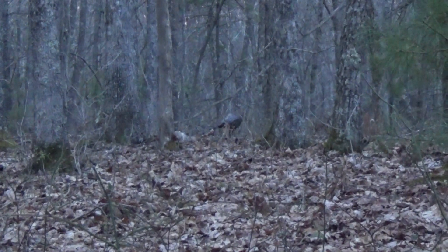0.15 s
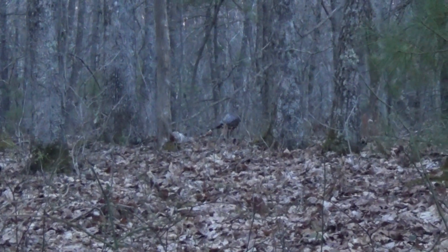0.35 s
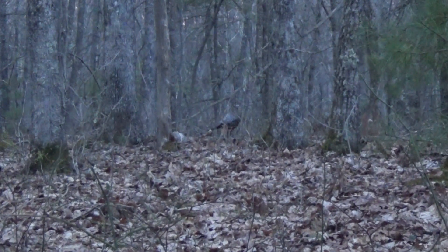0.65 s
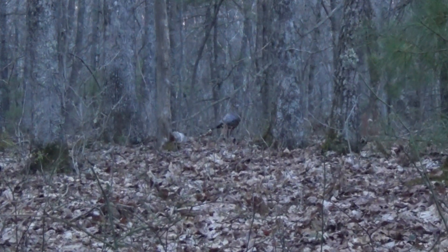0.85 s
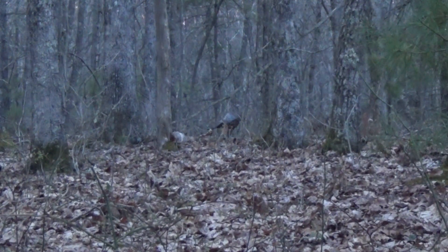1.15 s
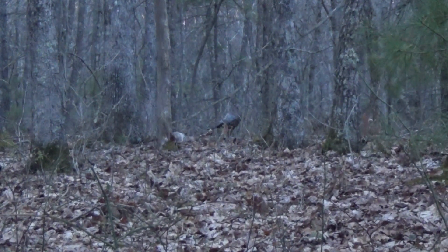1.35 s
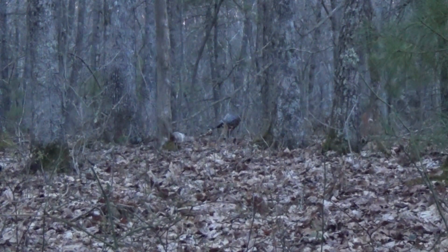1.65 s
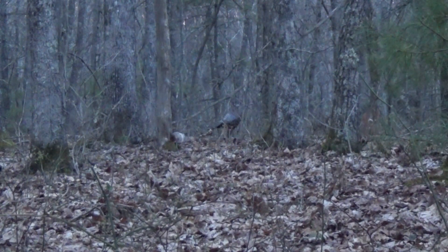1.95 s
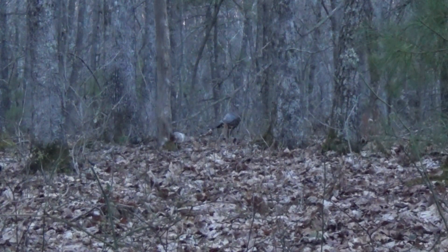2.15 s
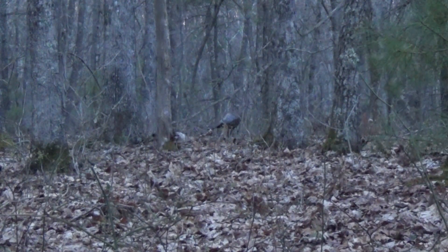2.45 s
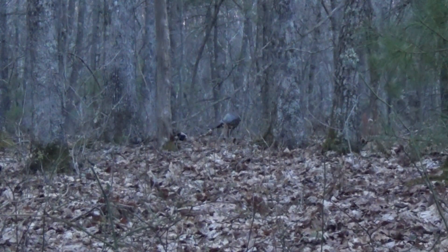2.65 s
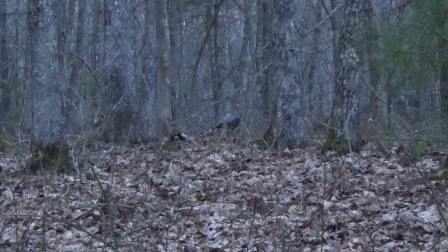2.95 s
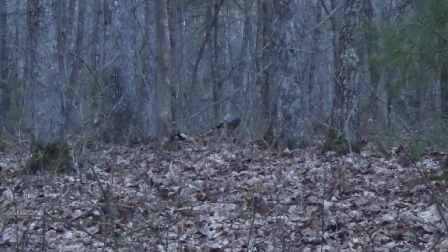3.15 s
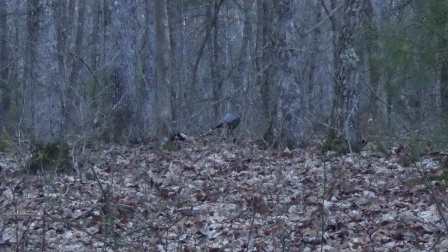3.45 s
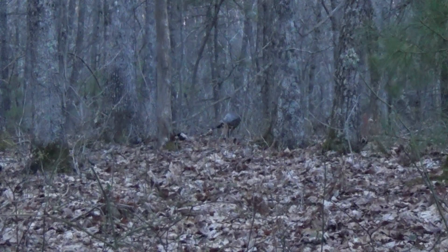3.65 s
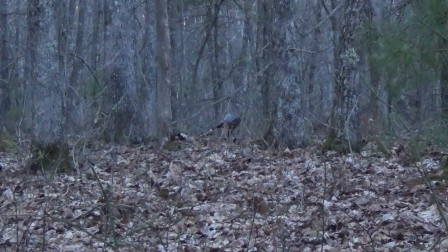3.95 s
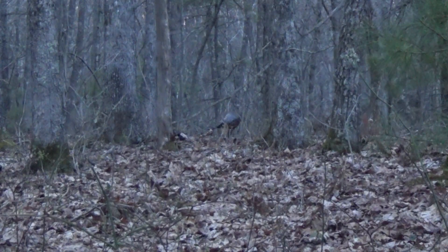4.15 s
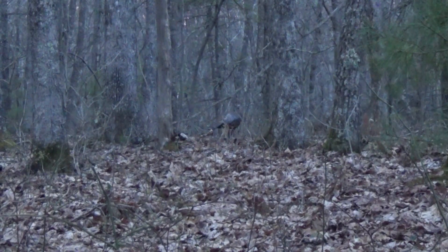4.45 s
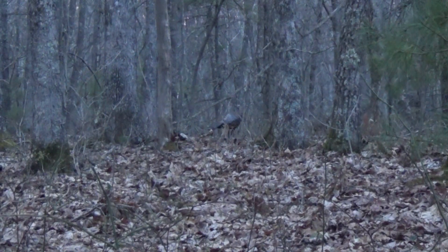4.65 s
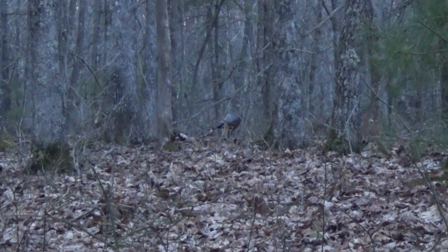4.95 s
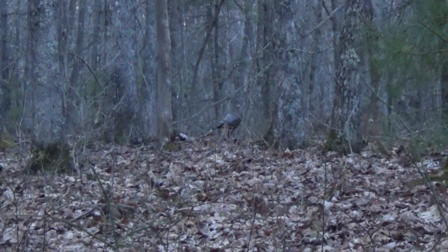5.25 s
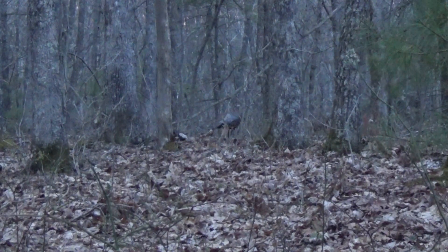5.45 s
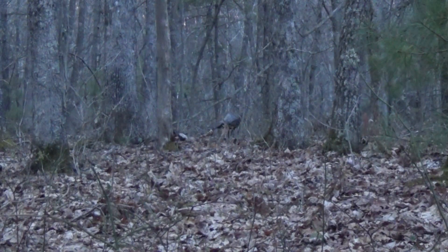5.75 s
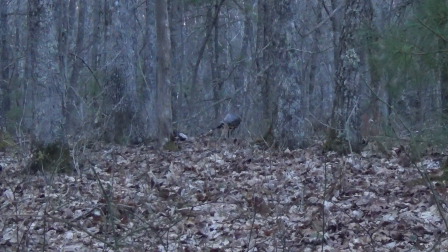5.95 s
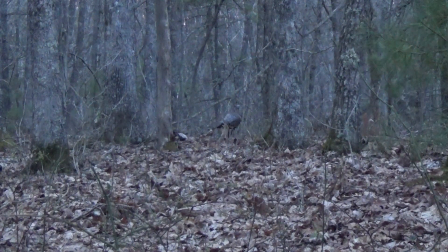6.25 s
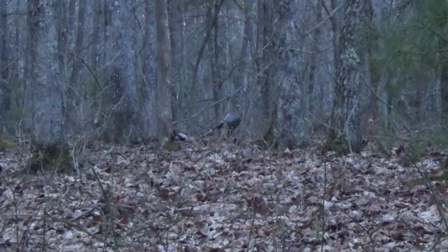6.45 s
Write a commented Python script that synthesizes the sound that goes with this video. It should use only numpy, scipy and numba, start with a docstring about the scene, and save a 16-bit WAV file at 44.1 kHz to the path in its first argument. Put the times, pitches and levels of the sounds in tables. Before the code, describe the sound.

Birds forage in dry leaves on a forest floor, close to a stereo microphone. Their feet rake and scuff in a busy opening flurry, with small stalks snapping and twigs clicking. The rustle thins to scattered ticks, then picks up again with more scratching, snaps and brief rasps of dragged stems. Other birds whistle faintly far away, twice, over the soft steady hush of the woods.

```python
"""Birds foraging in dry leaf litter, close to a stereo pair of microphones on a quiet forest floor.
Their feet rake and scuff the leaves, which buckle in clouds of tiny ticks and keep ticking as they
settle. Stalks snap, knocked twigs ring and dragged stems rasp, with a slight echo from the trunks.
Far off, other birds whistle faintly over the steady hush of the woods."""
import sys
import numpy as np
from scipy import signal
from scipy.fft import rfft, irfft, next_fast_len
from scipy.io import wavfile
from scipy.ndimage import uniform_filter1d
from numba import njit

SR = 44100
rng = np.random.default_rng(int(sys.argv[2]) if len(sys.argv) > 2 else 0)


def generate_wav(signal):
    """Clip the signal to [-1, 1] and save it as 16-bit WAV at the path in sys.argv[1]."""
    frames = np.transpose(np.atleast_2d(signal))
    scaled = np.clip(frames, -1, 1) * 32767
    pcm = np.round(scaled).astype(np.int16)
    wavfile.write(sys.argv[1], SR, pcm)


N = 291501
TIME = np.arange(N) / SR


def undb(db):
    """Decibels to gain."""
    return 10 ** (np.asarray(db) / 20)


def unit(x):
    """Scale to rms 1."""
    return x / np.sqrt(np.mean(x ** 2) + 1e-20)


def curves(table):
    """Each column after the first as a line through time."""
    times, *columns = np.transpose(table)
    return [np.interp(TIME, times, column) for column in columns]


def place(pan_db):
    """Left and right gains at constant power; pan_db is left minus right."""
    gains = undb(np.array([[.5], [-.5]]) * pan_db)
    return gains / np.sqrt(np.mean(gains ** 2, axis=0))


def colour(x, points):
    """Filter x along a curve of (freq_hz, gain_db) points."""
    hz, db = np.transpose(points)
    size = next_fast_len(N, real=True)
    bins_hz = np.maximum(np.fft.rfftfreq(size, 1 / SR), 1)
    gain = undb(np.interp(np.log(bins_hz), np.log(hz), db))
    return irfft(rfft(x, size) * gain, size)[..., :N]


def band(x, low_hz, high_hz, order=2):
    """Causal band-pass."""
    high = min(high_hz, .45 * SR)
    low = min(low_hz, .92 * high)
    return signal.sosfilt(signal.butter(order, [low, high], "band", fs=SR, output="sos"), x)


def spread(pair, side_db):
    """Middle and side to left and right."""
    return pair[0] + undb(side_db) * pair[1] * np.array([[1], [-1]])


def walk(rate_hz):
    """A smooth random wander of rms 1."""
    step = int(SR / rate_hz)
    held = np.repeat(rng.standard_normal(N // step + 1), step)
    return unit(uniform_filter1d(held, step)[:N])


def add(out, start_s, x):
    """Mix x into out from start_s on."""
    i = max(int(start_s * SR), 0)
    out[:, i:i + x.shape[1]] += x[:, :max(N - i, 0)]


# The hush all around the microphones: freq_hz, gain_db
HUSH_COLOUR = [(25, -24), (50, -22), (70, -3), (180, -4.5), (300, -6.5), (480, 2), (850, 3.5), (1800, -0.5),
               (3000, 0.5), (5000, 0), (9000, -2.5), (12200, -8), (16000, -18)]
# A soft hiss in the distance that swells late: time_s, level_db
FAR_HISS = [(0, -83), (4.0, -59), (4.9, -58), (5.3, -52), (5.7, -53), (6.05, -52), (6.35, -52.5),
            (6.61, -53)]


def woods(hush_db=-49, hum_hz=70, hum_db=-87.5):
    """Steady hush, its lows nearly alike left and right, with a faint hum and a hiss far away."""
    middle, side = rng.standard_normal((2, N))
    side = colour(side, [(60, -26), (250, -12.5), (1000, -7.5), (4000, -2.5), (8000, -4), (13000, -41)])
    hush = unit(colour(spread([middle, side], 0), HUSH_COLOUR)) * undb(hush_db + 0.094 * walk(3.5))
    hum = unit(np.sin(2 * np.pi * hum_hz * TIME)) * undb(hum_db + 2 * walk(7.5))
    hiss = unit(band(spread(rng.standard_normal((2, N)), -10.5), 3630, 4980))
    return hush + hum + hiss * undb(curves(FAR_HISS)[0] + walk(11))


def trunk_echo(x, t60_s):
    """The surrounding trunks scatter sound back as a diffuse tail."""
    t = np.arange(SR) / SR
    echo = band(rng.standard_normal((2, SR)), 200, 6000, order=1) * undb(-60 * t / t60_s)
    return signal.oaconvolve(x, echo / np.sqrt(np.sum(echo ** 2) / 2), axes=1)[:, :N]


# Bird notes from far off in the trees: start_s, length_s, start_hz, end_hz, level_db
WHISTLES = [(1.925, 0.028, 3330, 3440, -44), (1.948, 0.04, 3500, 3500, -49),
            (1.975, 0.032, 3500, 3500, -42), (2.02, 0.075, 3480, 3470, -51), (2.045, .03, 4090, 4120, -48),
            (2.108, 0.028, 4120, 4060, -44), (2.16, 0.28, 1150, 1200, -55.5), (2.42, 0.2, 1196, 1155, -58),
            (5.23, .11, 2824, 3060, -48), (5.26, 0.11, 3190, 3520, -50)]


def far_birds(waver_hz=45, trim_db=-4):
    """Thin, quivering whistles, smeared on their way through the trees."""
    out, quiver = np.zeros((2, N)), walk(170)
    for start_s, length_s, start_hz, end_hz, level_db in WHISTLES:
        progress = np.linspace(0, 1, int(length_s * SR))
        glide_hz = start_hz + (end_hz - start_hz) * progress
        pitch_hz = glide_hz + waver_hz * quiver[int(start_s * SR):][:len(progress)]
        note = np.sin(np.pi * progress) * np.sin(2 * np.pi * np.cumsum(pitch_hz) / SR)
        add(out, start_s, note * undb(level_db) * place(0))
    return undb(trim_db) * (out + trunk_echo(out, t60_s=0.84))


# Twigs knocked nearby, dead centre: start_s, pitch_hz, t60_s, level_db
TWIG_KNOCKS = [(.132, 990, 0.017, -25), (.189, 1670, 0.035, -29), (.221, 1190, .018, -29),
               (.304, 1100, .025, -28), (0.309, 376, 0.033, -37), (.511, 3050, 0.011, -28),
               (0.513, 5450, .04, -28.5), (0.544, 3780, 0.024, -28), (.7325, 2160, 0.02, -27),
               (0.7598, 3220, 0.015, -21), (0.773, 1290, 0.0083, -15), (0.9725, 8600, .009, -25),
               (1.0331, 1580, 0.012, -18.5), (1.034, 1190, 0.025, -27), (1.042, 4080, 0.021, -33),
               (1.058, 4050, 0.018, -26), (1.2425, 1450, 0.014, -23), (1.2426, 3750, 0.012, -23),
               (1.2427, 910, 0.016, -25.5), (1.917, 5630, .04, -42), (2.139, 380, 0.021, -34.5),
               (2.327, 1350, 0.015, -33), (2.454, 2330, .018, -35), (2.8398, 8400, 0.011, -25),
               (2.9289, 1990, 0.011, -28), (2.93, 4190, 0.0083, -21), (3.077, 800, 0.031, -29.5),
               (3.105, 1200, .016, -39), (3.159, 1390, 0.01, -31), (3.211, 2430, 0.014, -32),
               (3.255, 1900, .016, -35), (4.062, 1060, 0.01, -23), (4.172, 700, 0.13, -38.5),
               (4.2, 738, 0.094, -37.5), (4.196, 3910, 0.036, -28), (4.356, 736, 0.16, -40),
               (4.445, 3570, 0.023, -21), (4.599, 5500, 0.03, -26), (4.6203, 1040, 0.024, -23),
               (4.621, 720, 0.026, -28), (4.624, 1430, 0.013, -23.5), (4.623, 3350, 0.013, -26),
               (5.856, 400, 0.02, -31.5), (6.019, 1135, 0.047, -34.5)]


def twigs(grit=0.29):
    """A knocked twig rings in one short mode, a little rough where it rubs on the leaves."""
    out, t = np.zeros((2, N)), np.arange(SR // 10) / SR
    for start_s, pitch_hz, t60_s, level_db in TWIG_KNOCKS:
        rub = unit(band(rng.standard_normal((2, len(t))), 1.06 * pitch_hz, 1.26 * pitch_hz))
        ring = np.sin(2 * np.pi * pitch_hz * t) + grit * rub
        envelope = (1 - np.exp(-t * pitch_hz)) * undb(-60 * t / t60_s)
        add(out, start_s, ring * envelope * undb(level_db))
    return out


# Stems dragged over dry leaves close by: start_s, length_s, start_hz, end_hz, level_db
STEM_DRAGS = [(3.072, 0.26, 5340, 5430, -51), (3.12, 0.072, 4030, 3700, -48),
              (3.277, 0.03, 3260, 3400, -44), (4.334, 0.044, 3750, 3910, -40),
              (4.347, 0.036, 1306, 1146, -41.5), (4.534, 0.023, 2895, 2760, -39),
              (4.623, 0.037, 3085, 3290, -39.5), (4.728, 0.19, 1290, 1145, -51.5)]


def stems(slips_per_s=700, relative_width=0.15, side_db=-9):
    """A dragged stem sticks and slips; each slip rings a resonance that moves with the contact point."""
    out = np.zeros((2, N))
    for start_s, length_s, start_hz, end_hz, level_db in STEM_DRAGS:
        progress = np.linspace(0, 1, int(length_s * SR))
        chance, phase = rng.random((2, 2, SR // 2))[..., :len(progress)]
        slips = (chance < slips_per_s / SR) * np.exp(2j * np.pi * phase)
        ring = signal.lfilter([1], [1, -np.exp(-np.pi * relative_width * start_hz / SR)], slips)
        pitch_hz = start_hz + (end_hz - start_hz) * progress
        rasp = np.imag(ring * np.exp(2j * np.pi * np.cumsum(pitch_hz) / SR))
        rasp = unit(spread(band(rasp, start_hz / 2, start_hz * 2), side_db))
        swell = np.sqrt(np.abs(np.sin(np.pi * progress)))
        add(out, start_s, rasp * swell * undb(level_db))
    return out


# Quick scuffs of a foot near the microphones: start_s, length_s, level_db, low_hz, high_hz, pan_db
FOOT_SCUFFS = [(0.071, 0.019, -26.5, 1800, 8450, 4), (.076, 0.02, -35, 300, 2200, 6),
               (0.433, 0.033, -37, 2190, 8690, 11), (0.515, 0.018, -39, 1910, 5510, -8),
               (0.735, 0.0083, -37, 1800, 4500, -7), (3.016, 0.008, -44, 1450, 9540, 4),
               (3.047, 0.016, -39.5, 6510, 9530, 3.2), (4.167, 0.0099, -38, 900, 3400, -6),
               (4.193, 0.016, -38.5, 2560, 4080, -7), (4.352, 0.019, -33, 1740, 4900, -8),
               (4.366, 0.013, -37, 8000, 12000, 0), (4.446, 0.012, -41, 3440, 8500, -3),
               (4.514, 0.022, -39, 3110, 8340, 5), (4.537, 0.021, -36, 5560, 9000, 5),
               (4.616, 0.0083, -31, 2500, 4200, -8), (4.641, 0.015, -47, 2700, 9100, -0.8),
               (5.353, 0.013, -46, 2890, 10120, -2)]


def scuffs(attack_s=0.0019, tail_s=0.0066, rough_db=6, side_db=-7):
    """A foot tears through many leaves at once: a short, ragged burst."""
    out, t = np.zeros((2, N)), np.arange(SR // 10) / SR
    for start_s, length_s, level_db, low_hz, high_hz, pan_db in FOOT_SCUFFS:
        noise = spread(rng.standard_normal((2, len(t))), side_db)
        ragged = noise * undb(rough_db * (2 * rng.random(len(t)) - 1))
        burst = band(band(ragged, low_hz, high_hz, order=1), 250, 9100)
        press = np.minimum(t / attack_s, 1) * np.exp(-np.maximum(t - 0.78 * length_s, 0) / tail_s)
        add(out, start_s, unit(burst) * press * undb(level_db) * place(pan_db))
    return out


# Stalks and twigs snapping at close range: start_s, level_db, low_hz, high_hz, splinter_db, pan_db
STALK_SNAPS = [(0.0164, -34, 3710, 8800, -6, 2), (0.019, -33, 2200, 8500, -8, 2),
               (0.066, -33, 2200, 8800, -12, 4), (.1719, -40, 3100, 8900, -4, 1),
               (0.2073, -33, 5000, 9000, -3, 3), (.318, -41, 6000, 9500, -9, 2),
               (.329, -47, 2500, 6500, -7, 4), (0.443, -34, 4800, 8500, -5, 4),
               (0.584, -37, 4500, 9000, -4, 0), (0.693, -38, 5000, 9000, -4, 0),
               (0.512, -30.5, 2730, 4200, -11, -2), (0.533, -34.5, 1410, 3450, -7, 8),
               (0.61, -31.5, 5340, 10130, 2, -3), (0.7322, -31, 1800, 4130, 4, -5),
               (0.76, -33, 2700, 3900, -1, -3), (.7122, -37, 2600, 11900, -4, -5),
               (0.747, -36, 5300, 9100, -6, -3), (0.9236, -38.5, 3400, 10600, -6, 2),
               (1.0139, -43, 2700, 10800, -6, 1), (0.973, -37.5, 8200, 9340, -13, -1),
               (1.027, -36, 3990, 6800, -10, 4), (1.2425, -26.5, 2150, 3300, -4, 3),
               (1.2418, -34, 4300, 6600, -1, 3), (1.3598, -38, 1790, 9500, 0, 0),
               (1.492, -36, 1800, 3600, -14, 8), (1.5269, -38.5, 5800, 8800, -11, -3),
               (1.5942, -39, 4900, 7700, -4, -2), (1.7661, -39, 2600, 9530, 6, -1),
               (1.917, -37.5, 3040, 9460, 1, -1), (2.1136, -35, 5830, 10500, -16, 8),
               (2.3815, -38.5, 6840, 11090, -5, -1), (2.4537, -41, 1100, 2620, 10, 14),
               (2.4546, -42, 7200, 9000, 9, 10), (2.583, -42.5, 2700, 9600, -10, 6),
               (2.6556, -40.5, 6040, 10700, -10, -2), (2.6942, -42, 4400, 8400, -6, 4),
               (2.701, -36.5, 4000, 9500, -2, -2), (2.8145, -37, 6000, 11800, -11, 0),
               (2.8263, -43, 3000, 5300, -6, 0), (2.8409, -31.5, 8600, 11700, -15, 0),
               (2.8401, -39.5, 3000, 5800, -6, 0), (2.929, -24.5, 8400, 10400, -8, 4),
               (2.9291, -32.5, 1600, 4460, -1, 2), (2.9293, -37.5, 430, 1300, -6, 2),
               (3.3544, -35.5, 1640, 8530, -7, 3), (3.3668, -40, 6400, 8520, -7, -2),
               (3.437, -40.5, 6000, 8760, 3, 3.6), (3.4658, -45, 3900, 9000, -6, 1),
               (3.6661, -41.5, 5600, 9500, -6, 4), (3.682, -39, 7380, 10230, -8, 6),
               (3.7808, -40, 4200, 9800, -6, -4), (3.8833, -40, 5700, 11500, -13, 4),
               (4.2414, -38, 5600, 8500, -7, 6), (4.003, -37.5, 5720, 7250, 6, 0),
               (4.1973, -32.5, 2700, 4200, 2, -11), (4.354, -32, 1100, 3700, 15, -11),
               (4.3633, -32.5, 2200, 3600, -5, -9), (4.4425, -32, 3400, 10500, -2, -5),
               (4.4462, -33, 2000, 9800, 2, -3), (4.5082, -32, 4780, 9000, -1, -3),
               (4.543, -34, 7400, 9800, 2, 9), (4.5585, -30, 6570, 9100, -5.5, 5),
               (4.5885, -36, 3900, 5100, 4, -7), (4.5986, -31, 5380, 9600, 0, 1),
               (4.6197, -32, 800, 1700, 8, -4), (4.67, -37, 6500, 9500, 2, 0),
               (4.821, -36.5, 3340, 8530, 5, 0), (4.9726, -41, 4000, 7200, -4, 2),
               (5.021, -35, 1300, 7000, -7, 0), (5.044, -35, 4250, 9000, 4, -4),
               (5.077, -37.5, 5600, 7200, 2, -1), (5.1502, -40, 7600, 9600, -10, 2),
               (5.173, -39, 6540, 9000, 2, -1), (5.2353, -37.5, 5490, 10560, -13, -1),
               (5.342, -32, 2840, 10500, 9, 2), (5.4984, -41.5, 4800, 8900, -6, 1),
               (5.6172, -38, 2090, 8820, -7, -2), (5.6968, -36, 3500, 7250, -6, 4.5),
               (5.8743, -33.5, 5590, 10000, -16, 0), (5.9143, -38, 5800, 10200, -3, 0),
               (6.0354, -38, 3800, 9500, -6, 1), (6.2734, -42, 7000, 10400, -6, 1),
               (6.2895, -38.5, 3400, 7600, -6, 0), (6.3898, -39, 6800, 8900, -6, -4),
               (6.4819, -38, 4700, 8100, -6, -3)]


def snaps(splinter_s=0.0023, bounce_s=.00012, bounce_gain=.45, side_db=-7):
    """A stalk breaks in one sharp pulse that bounces off the ground; its fibres splinter just after."""
    out, t = np.zeros((2, N)), np.arange(SR // 25) / SR
    pulse = 1. * (t == 0)
    to_5_ms = np.sqrt(.005 / t[-1])  # a snap holds the energy of 5 ms at level_db
    for start_s, level_db, low_hz, high_hz, splinter_db, pan_db in STALK_SNAPS:
        delay = 2 + int(bounce_s * SR * rng.uniform(0.45, 2.4))
        snap = unit(band(pulse - bounce_gain * np.roll(pulse, delay), low_hz, high_hz, order=1))
        noise = spread(rng.standard_normal((2, len(t))), side_db)
        fibres = noise * np.exp(-t / splinter_s) * (1 - np.exp(-t / 0.0009))
        crack = snap + undb(splinter_db) * unit(band(fibres, low_hz, high_hz, order=1))
        # a thick twig has no fine fibres, so its treble ends sooner
        crack = band(crack, 390, min(1.33 * high_hz, 13000), order=3)
        add(out, start_s, unit(crack) * to_5_ms * undb(level_db) * place(pan_db))
    return out


@njit
def buckle(onsets, pitch_hz, left, right, flutter_s, noise, relative_width):
    """Each tick of a buckling leaf is a pulse and a dying flutter sent through its own band-pass."""
    out = np.zeros((2, N))
    for j in range(len(onsets)):
        tuning = np.tan(np.pi * pitch_hz[j] / SR)
        fade = np.exp(-1 / (flutter_s[j] * SR))
        length = min(int(4 * flutter_s[j] * SR + 3 * SR / pitch_hz[j]), N - onsets[j])
        for channel in range(2):
            band_state, low_state = 0., 0.
            flutter = np.sqrt(2 / (flutter_s[j] * SR))
            gain = left[j] if channel == 0 else right[j]
            for i in range(length):
                drive = flutter * noise[channel, (997 * j + i) % N] + (i == 0)
                tick = band_state + tuning * (drive - low_state)
                tick /= 1 + tuning * (tuning + relative_width)
                band_state = 2 * tick - band_state
                low_state += 2 * tuning * tick
                flutter *= fade
                out[channel, onsets[j] + i] += gain * tick
    return out


def leaves(ticks_per_s, size_db, low_hz, high_hz, width, scatter_db, flutter_s, side_db,
           ticks_per_leaf=1, crunch_s=.004):
    """A cloud of leaves, mostly tiny, a few large; each gives way at its own pitch and place."""
    per_leaf = rng.random((int(ticks_per_s * N / SR / ticks_per_leaf), 4))
    when, pitch, size, where = np.repeat(per_leaf, ticks_per_leaf, axis=0).T
    sign, hold, lag = rng.random((len(when), 3)).T
    strength = np.sign(sign - .5) * undb(size_db * np.minimum(-np.log(1 - size), 4))
    left, right = strength * place(scatter_db * (2 * where - 1))
    pitch_hz = np.minimum(low_hz * (high_hz / low_hz) ** pitch, .4 * SR)
    noise = spread(rng.standard_normal((2, N)), side_db)
    onsets = (when * N + lag * crunch_s * SR).astype(np.int64) % N
    return buckle(onsets, pitch_hz, left, right, flutter_s * (.5 + hold), noise, float(width))


def stroke(start_s, length_s, settle_s, attack_s=0.0077):
    """One stroke of a foot: it gains speed, holds, and the leaves come to rest."""
    rise = np.clip((TIME - start_s) / attack_s, 0, 1)
    return rise * np.exp(-np.clip((TIME - start_s - length_s) / settle_s, 0, 20))


# The litter stirring between strokes, a little left of centre: time_s, bed_db, top_db
LITTER_STIR = [(0, -38.5, -36), (0.65, -48, -42), (0.82, -44, -43.5), (1.12, -48, -44.5),
               (1.35, -53, -48.5), (1.7, -55.5, -53), (1.95, -52.5, -49.5), (2.25, -52.5, -52),
               (2.5, -50.5, -52), (2.85, -52.5, -50.5), (3.55, -52.5, -50), (4.05, -51, -47.5),
               (4.45, -43, -44), (5.0, -48.5, -45), (5.7, -52, -48.5), (6.61, -51.5, -45.5)]
# Feet raking the litter in front of the microphones: start_s, length_s, bed_db, top_db, pan_db
FOOT_STROKES = [(-0.02, 0.019, -38, -28.5, 6), (0.05, 0.062, -41.5, -36, 7),
                (0.16, 0.091, -35.5, -36.5, 4.5), (0.39, 0.059, -40.5, -35.5, 3),
                (0.51, 0.051, -47, -54, 0), (0.695, 0.056, -44, -44.5, 2), (0.85, 0.12, -50, -42.5, 4),
                (0.98, 0.041, -46.5, -48, 5), (3.005, 0.099, -45.5, -49, 0), (3.14, 0.089, -44.5, -48, -2),
                (3.66, 0.18, -56.5, -49, 2), (4.15, 0.07, -49.5, -59, 1), (4.33, 0.021, -46, -56, -1),
                (4.511, 0.054, -50, -40, 2), (4.62, 0.017, -49, -39.5, 0), (4.72, 0.097, -47.5, -52, 3),
                (5.28, 0.04, -49, -51, 2)]


def raking(bed_settle_s=0.082, top_settle_s=0.043, stir_pan_db=1.3):
    """Left and right strength of the deep bed and the dry top: strokes add power to the stirring."""
    bed, top = ((undb(db) * place(stir_pan_db)) ** 2 for db in curves(LITTER_STIR))
    for start_s, length_s, bed_db, top_db, pan_db in FOOT_STROKES:
        bed += (undb(bed_db) * place(pan_db) * stroke(start_s, length_s, bed_settle_s)) ** 2
        top += (undb(top_db) * place(pan_db) * stroke(start_s, length_s, top_settle_s)) ** 2
    return np.sqrt(bed), np.sqrt(top)


# The dull crunch of the deep leaf bed, heard close: freq_hz, gain_db
BED_COLOUR = [(60, -8), (140, -15), (330, -5), (700, 0), (1400, 0.5), (3200, -1.5), (5200, -11),
              (9200, -21), (16000, -40)]
# The bright crinkle of the dry top leaves, heard close: freq_hz, gain_db
TOP_COLOUR = [(1000, -7.5), (3000, -0.5), (5600, -2.5), (8800, 1), (10700, -3.5), (12700, -13),
              (16000, -18)]


def rustle():
    """Underfoot the bed crunches, the top crinkles and brittle leaves crackle; loose ones tick on."""
    bed, top = raking()
    crunch = leaves(ticks_per_s=5600, size_db=2.5, low_hz=163, high_hz=9500, width=0.51,
                    scatter_db=5.5, flutter_s=0.0016, side_db=-8, ticks_per_leaf=3)
    crinkle = leaves(ticks_per_s=5400, size_db=2, low_hz=2340, high_hz=16400, width=0.61,
                     scatter_db=-0.5, flutter_s=0.0015, side_db=-4.5, ticks_per_leaf=3)
    crackle = leaves(ticks_per_s=170, size_db=4, low_hz=3500, high_hz=11500, width=1,
                     scatter_db=6, flutter_s=0.00042, side_db=-9)
    settling = leaves(ticks_per_s=420, size_db=5, low_hz=3850, high_hz=15400, width=0.99,
                      scatter_db=-1, flutter_s=0.001, side_db=-19)
    return (unit(colour(crunch, BED_COLOUR)) * bed * undb(0.3)
            + unit(colour(crinkle, TOP_COLOUR)) * top
            + unit(colour(crackle, TOP_COLOUR)) * top * undb(-10.5)
            + unit(colour(settling, TOP_COLOUR)) * undb(-51))


def microphone_pair(x):
    """Two closely spaced microphones hear long waves nearly alike."""
    middle, side = (x[0] + x[1]) / 2, (x[0] - x[1]) / 2
    narrowing = [(125, -19), (250, -12), (500, -7), (1000, -1.5), (5000, -1), (9000, -0.5), (13000, -8)]
    return spread([middle, colour(side, narrowing)], 0)


def scene():
    """The litter up close with a slight forest echo; behind it, the far birds and the hush."""
    litter = rustle() + snaps() + scuffs() + stems() + twigs()
    echo = undb(-17) * trunk_echo(litter, t60_s=0.61)
    return microphone_pair(litter + echo) + far_birds() + woods()


def record(dry):
    """The recorder cuts off steeply above 16 kHz."""
    return signal.sosfilt(signal.ellip(10, .2, 70, 16000, fs=SR, output="sos"), dry)


dry = scene()
out = record(dry)
generate_wav(out)
```